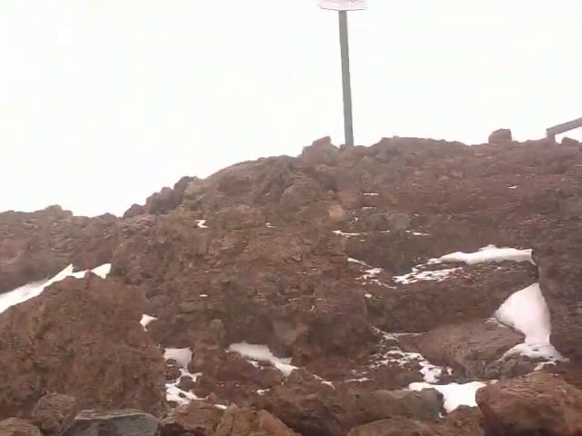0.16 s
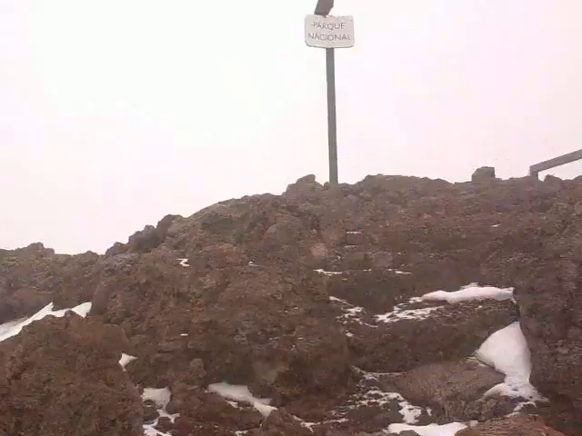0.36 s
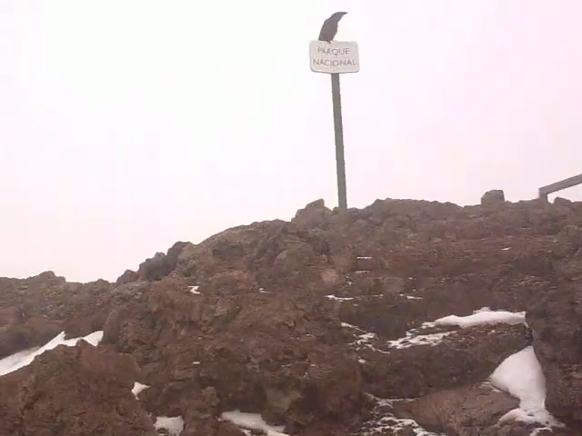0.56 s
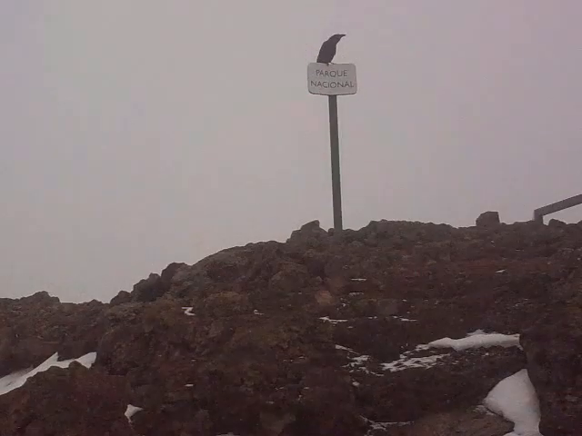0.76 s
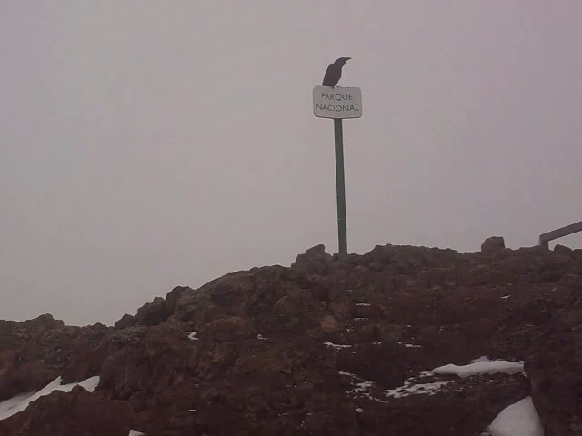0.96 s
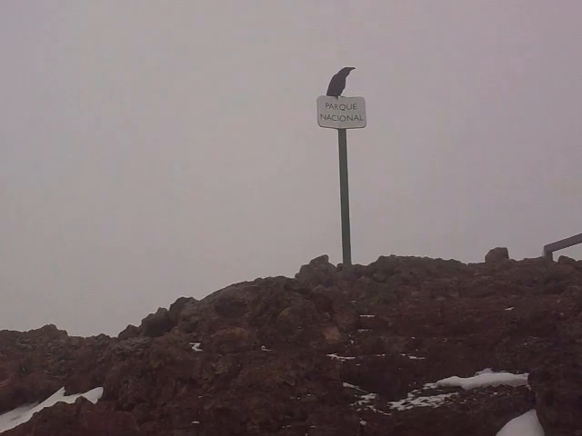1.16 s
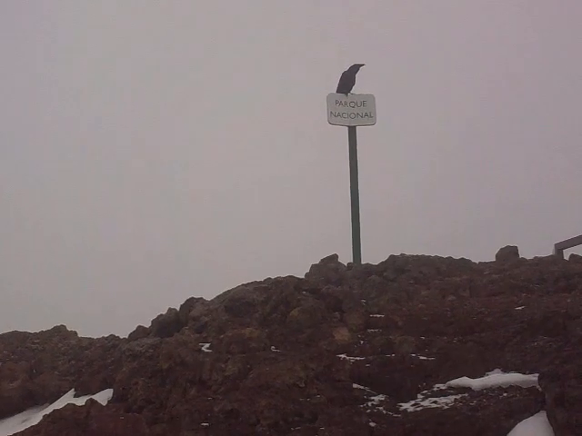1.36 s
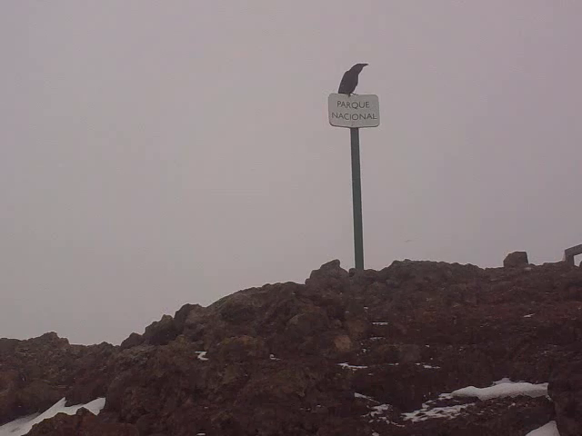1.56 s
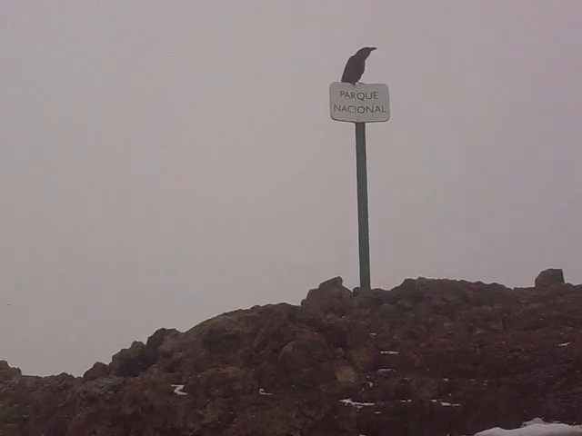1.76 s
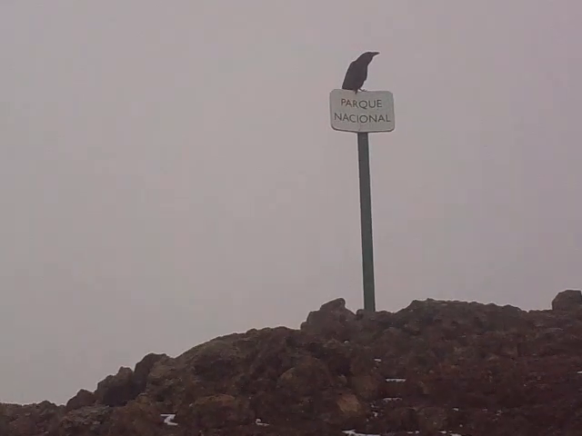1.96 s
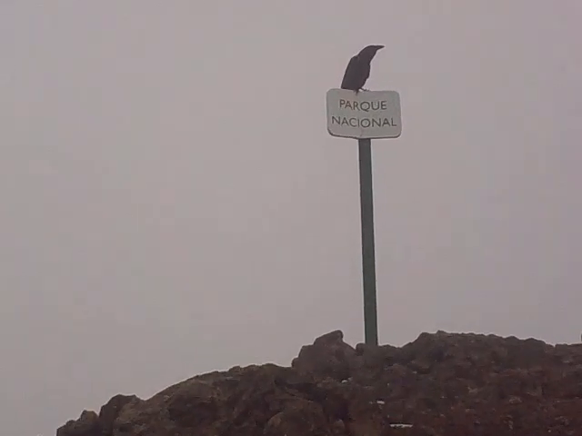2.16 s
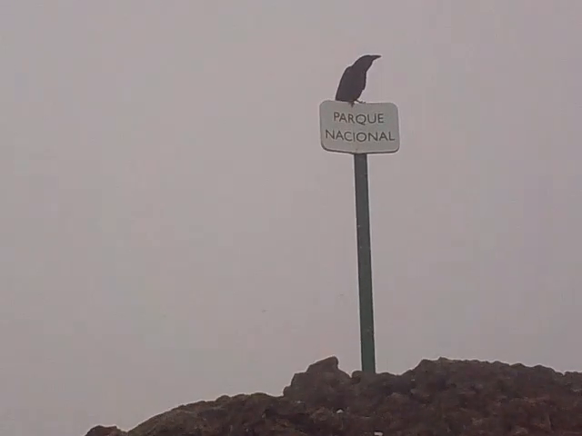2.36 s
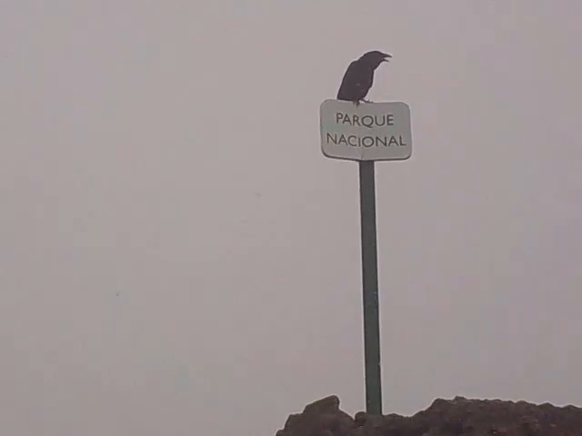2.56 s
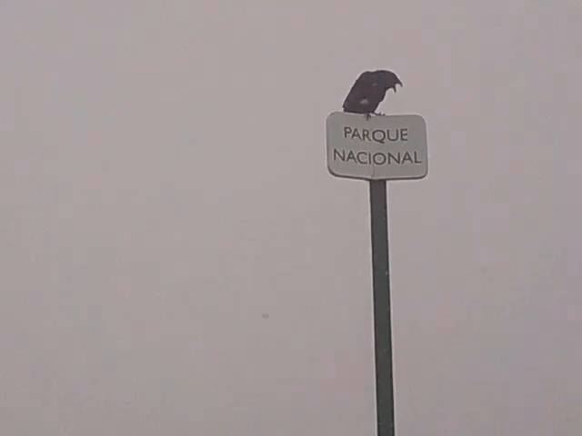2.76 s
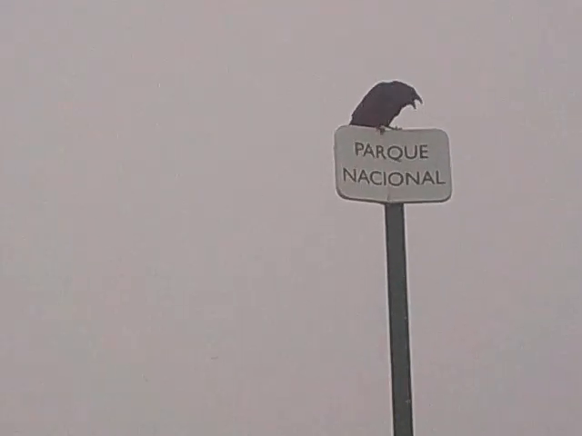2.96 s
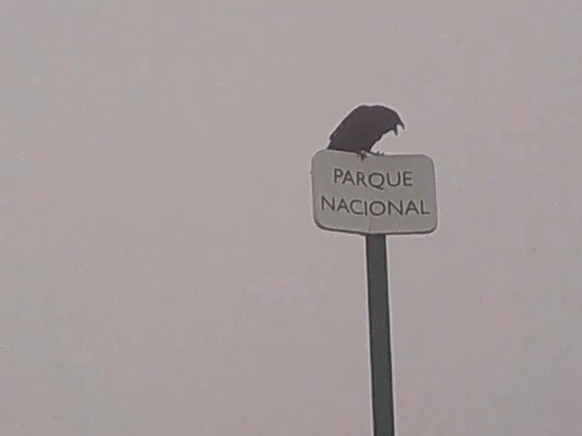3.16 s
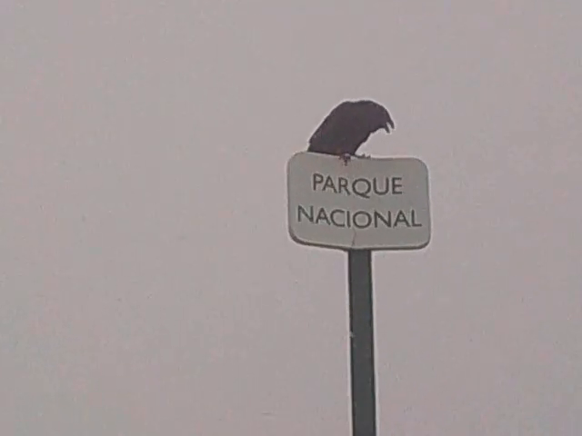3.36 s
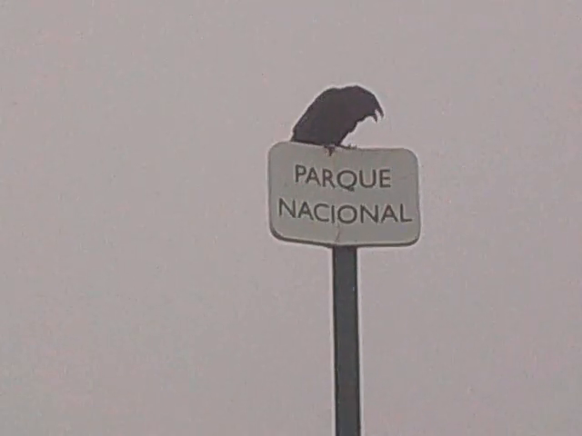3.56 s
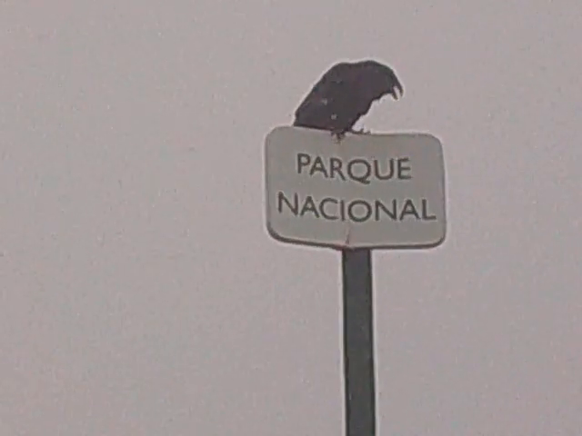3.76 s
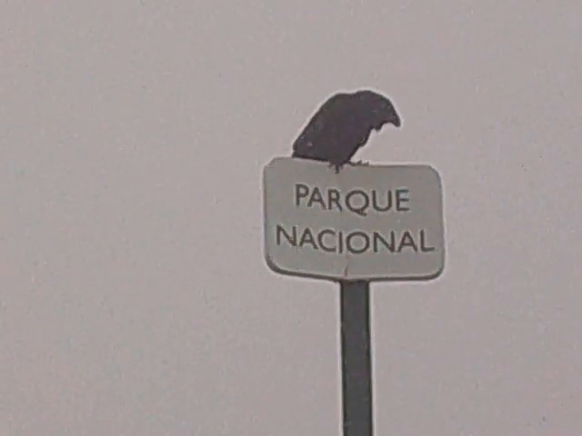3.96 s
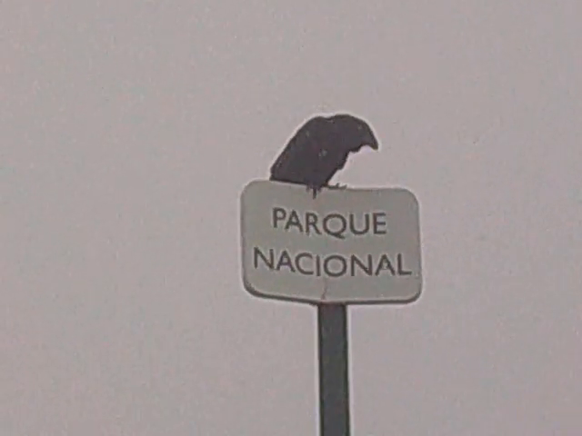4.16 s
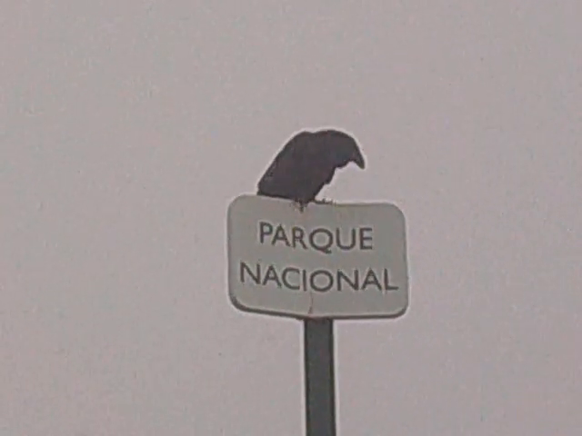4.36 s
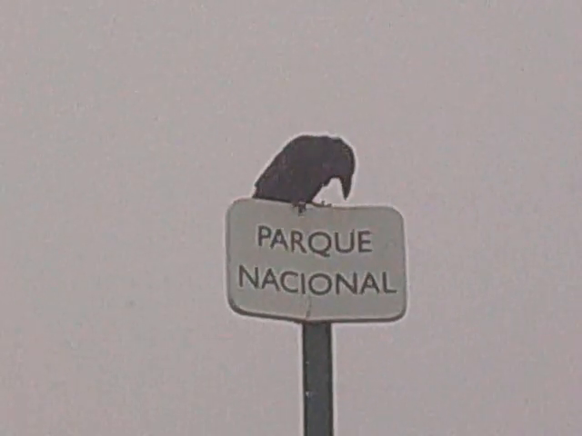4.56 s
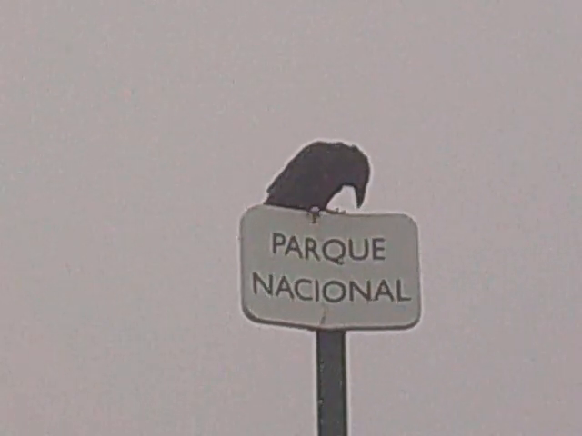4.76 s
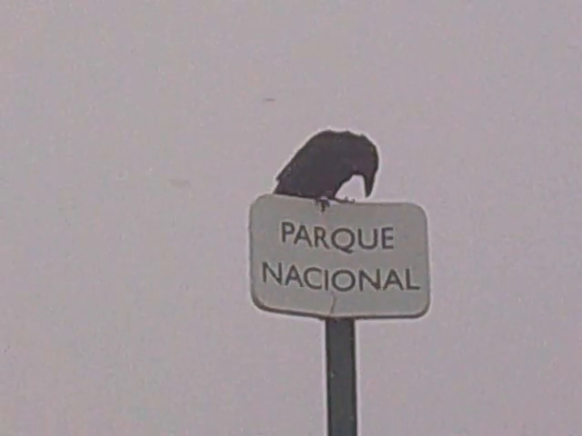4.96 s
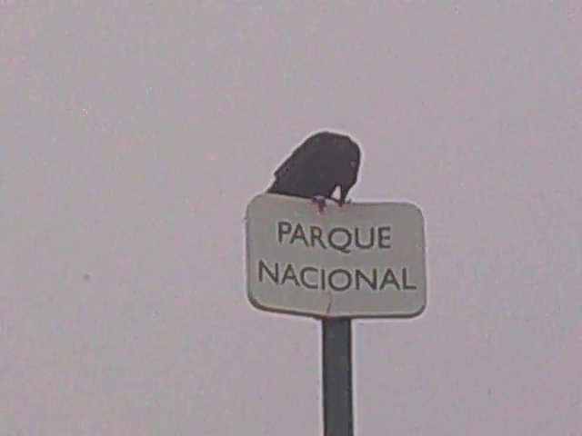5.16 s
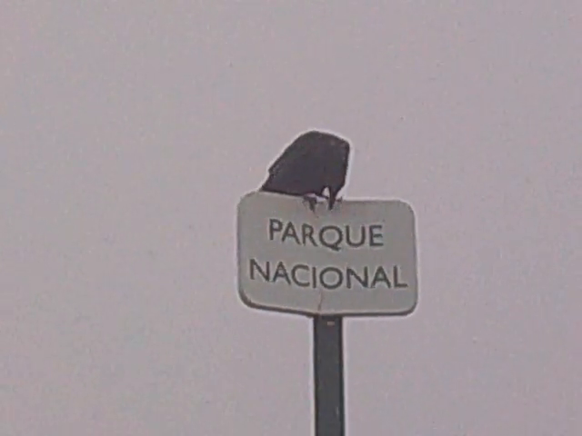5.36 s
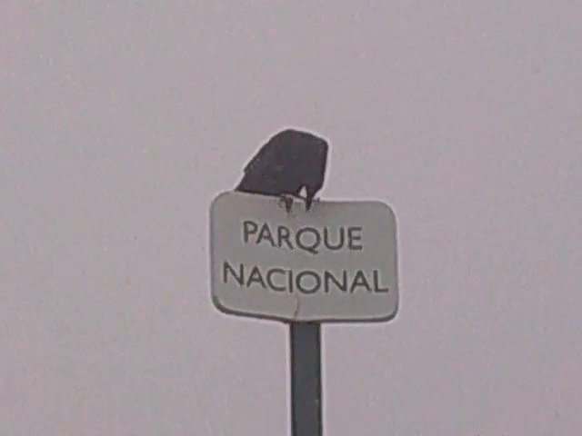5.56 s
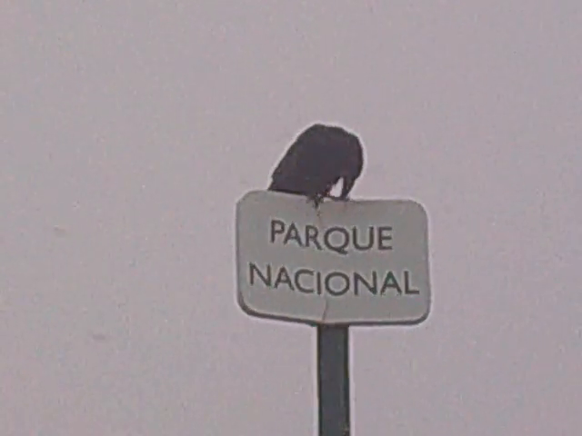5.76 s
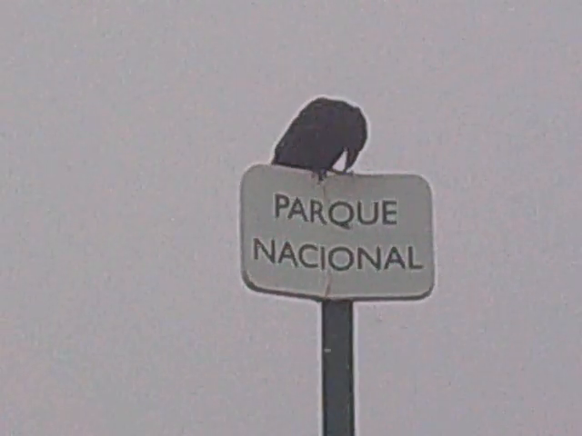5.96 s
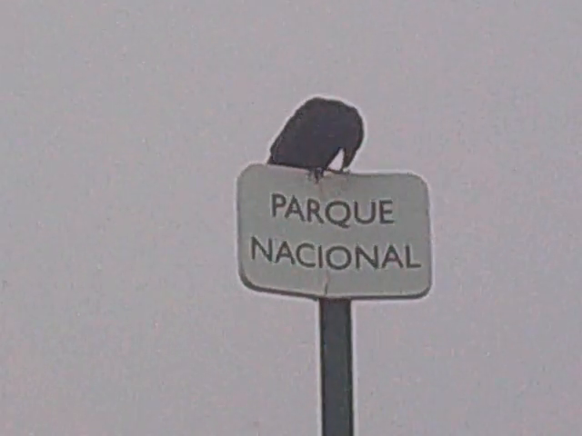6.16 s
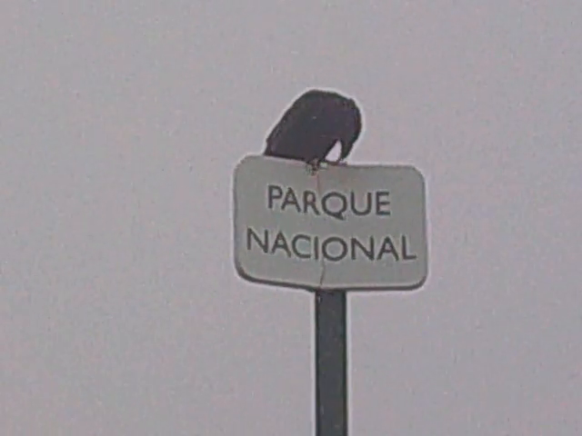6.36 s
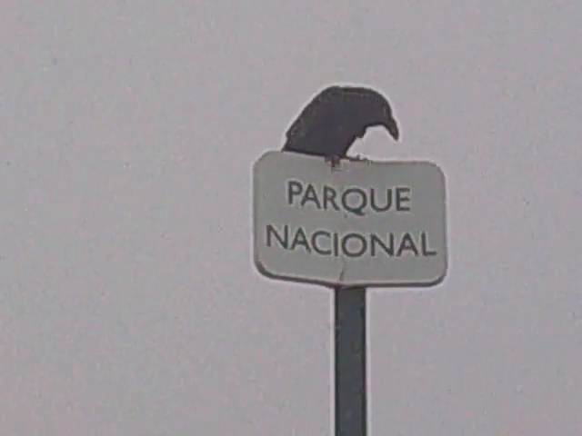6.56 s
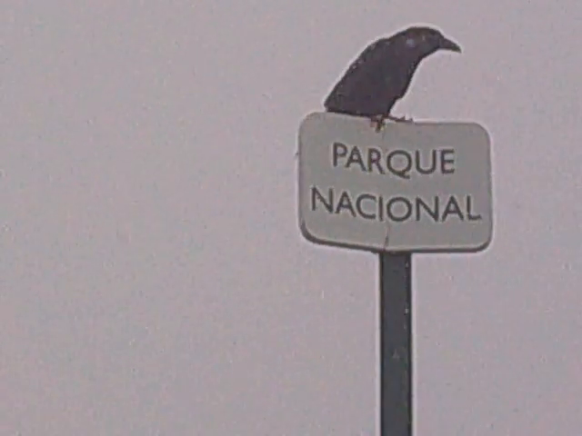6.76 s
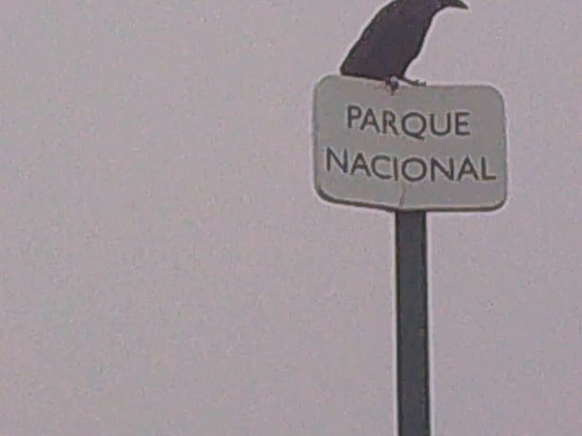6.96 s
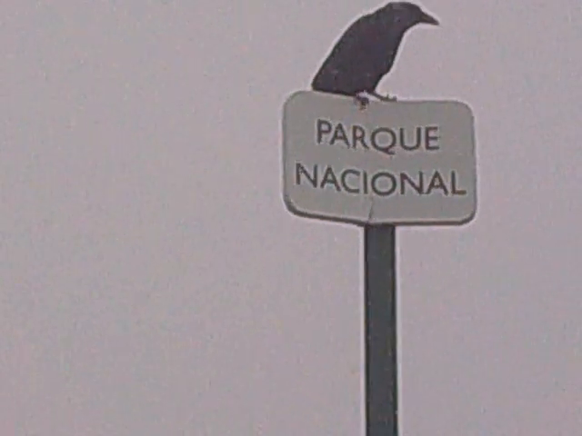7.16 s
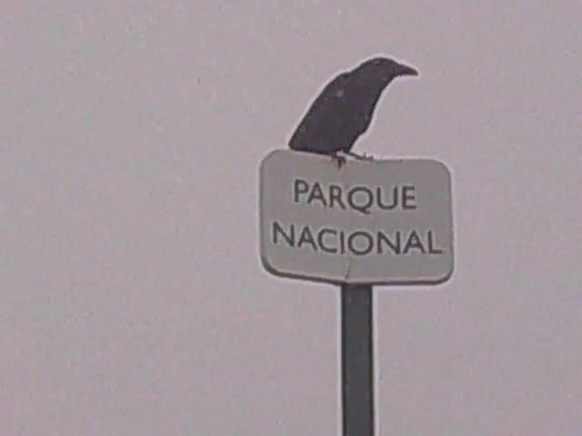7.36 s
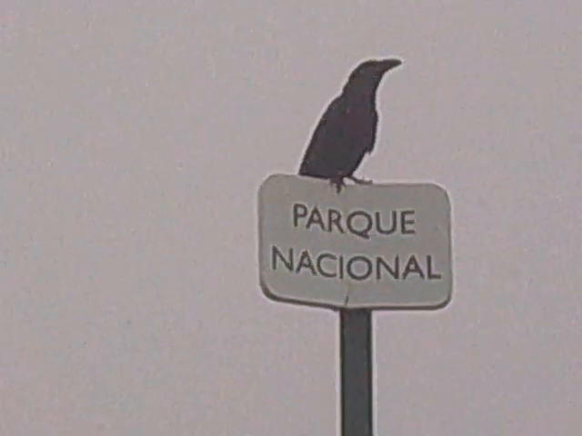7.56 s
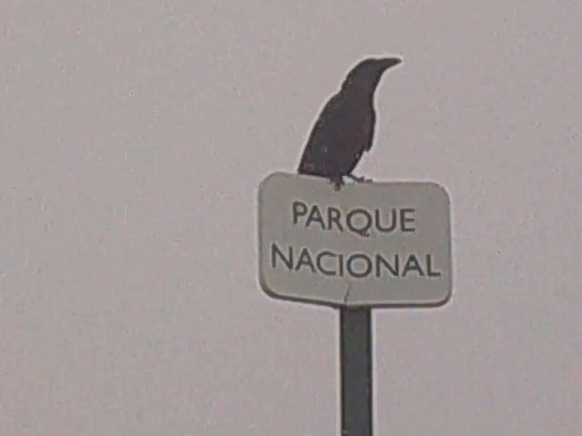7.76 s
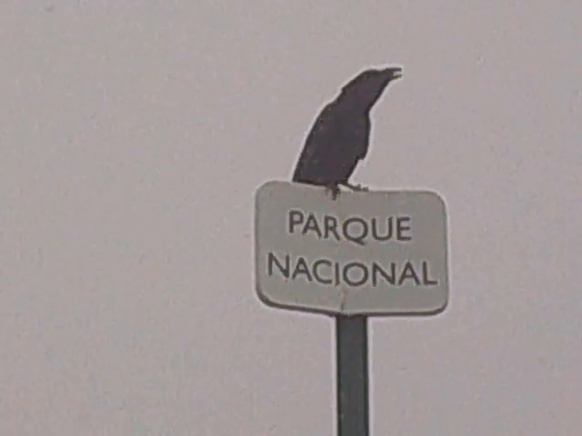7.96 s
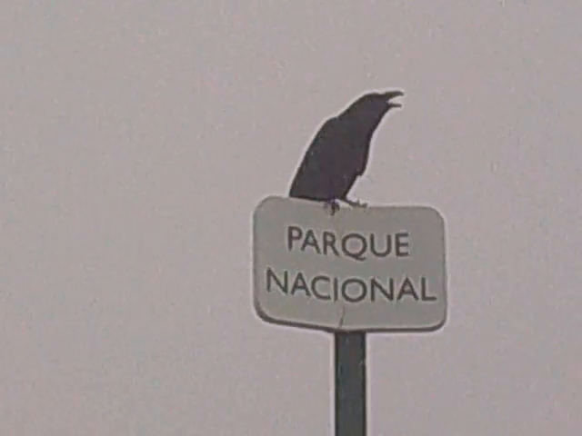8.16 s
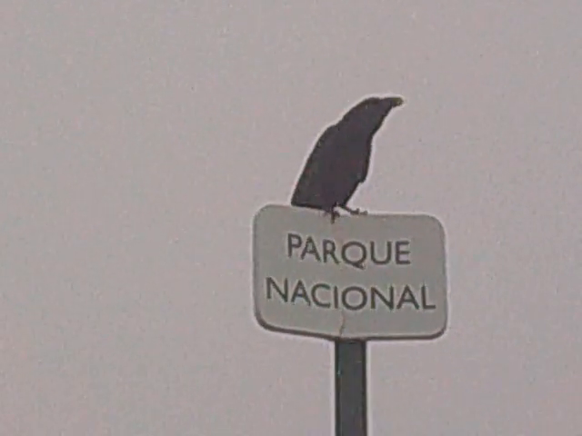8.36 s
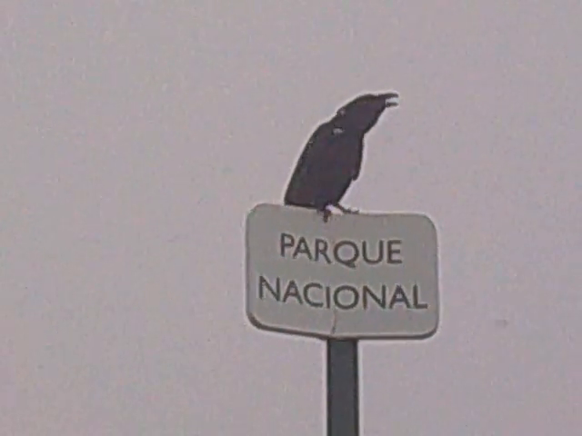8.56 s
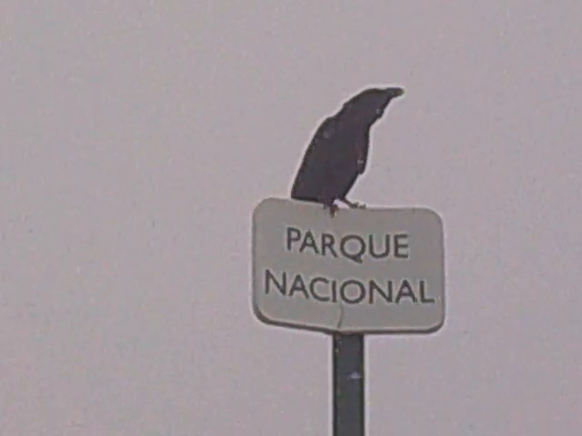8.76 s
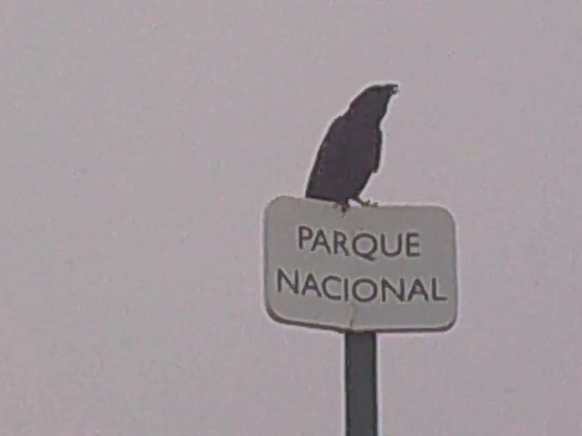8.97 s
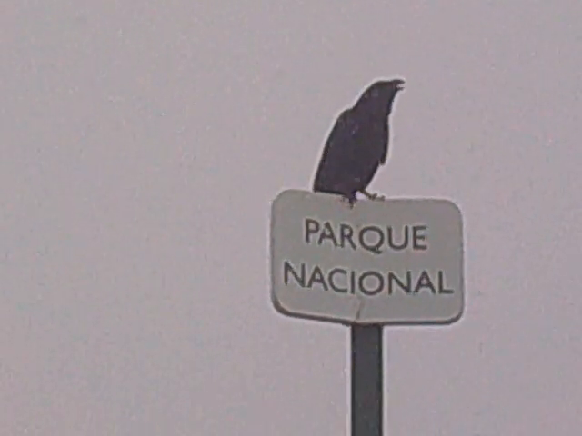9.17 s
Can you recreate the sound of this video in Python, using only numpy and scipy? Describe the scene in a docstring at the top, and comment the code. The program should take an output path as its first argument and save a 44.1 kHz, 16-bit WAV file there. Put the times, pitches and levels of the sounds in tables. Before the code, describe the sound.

A raven gives short hoarse croaks in small runs on a quiet windy mountaintop, with sleet ticking and sharp pops striking the microphone.

```python
"""Thin, nearly still air murmurs on a mountain top: shaped noise that swells and drifts.
From the start a raven croaks in short runs: pulses rattle, ring its windpipe and beak, and echo off rocks.
Soon sleet ticks nearby (short noise bursts) and soft buffets brush the microphone (swells of low noise).
From 1.5 s some grains strike the microphone: a shove, a crack and a ringing casing.
Near 7 s one gust rises fast and falls more slowly: shaped noise with crackles."""
import sys
import numpy as np
from scipy import signal
from scipy.fft import next_fast_len
from scipy.io import wavfile
from scipy.ndimage import uniform_filter1d

SR = 44100
rng = np.random.default_rng(int(sys.argv[2]) if len(sys.argv) > 2 else 0)


def generate_wav(sig):
    """Save sig (samples, or channels by samples) to the path in sys.argv[1] as 16-bit PCM at SR."""
    pcm = np.round(np.clip(np.atleast_2d(sig).T, -1, 1) * 32767).astype(np.int16)
    wavfile.write(sys.argv[1], SR, pcm)


N = 407484
TIME = np.arange(N) / SR


def gain_of(db):
    """Turns decibels into a plain multiplier."""
    return 10 ** (np.asarray(db) / 20)


def evened(x):
    """Scales a sound to an average strength (rms) of one."""
    return x / np.sqrt(np.mean(x ** 2) + 1e-20)


def smooth(x, seconds):
    """Runs a moving average twice, each of the given length."""
    size = max(int(seconds * SR), 1)
    once = uniform_filter1d(x, size)
    return uniform_filter1d(once, size)


def steadied(x):
    """Holds the strength near one from moment to moment, but keeps the single pulses."""
    power = abs(smooth(x ** 2, 0.022))
    return x / np.sqrt(power + 1e-14)


def wander(size, seconds):
    """A smoothed random curve around zero; more seconds make it slower."""
    curve = evened(smooth(rng.standard_normal(size + 4000), seconds))
    return curve[2000:2000 + size]


def ramp(u):
    """Eases from 0 to 1 as u does, then holds."""
    return np.sin(np.pi / 2 * np.clip(u, 0, 1))


def add(mix, s, sound):
    """Mixes a sound in at time s; what comes before time zero is dropped."""
    at = round(s * SR)
    sound = sound[max(-at, 0):]
    part = mix[max(at, 0):][:len(sound)]
    part += sound[:len(part)]


def coloured(x, points):
    """Boosts and cuts pitches to follow (f/Hz, level/dB) points, with no sound ahead of its cause."""
    size = next_fast_len(len(x) + 4096)
    hz, db = np.transpose(points)
    bin_hz = abs(np.fft.fftfreq(size, 1 / SR))
    bin_db = np.interp(np.log(bin_hz + 1), np.log(hz), db)
    # the Hilbert transform finds the timing (phase) that goes with these levels
    response = np.exp(np.conj(signal.hilbert(np.log(gain_of(bin_db)))))
    return np.fft.ifft(np.fft.fft(x, size) * response).real[:len(x)]


def band(x, hz, kind, order=2):
    """Keeps the highs, the lows or a band, with a Butterworth filter."""
    return signal.sosfilt(signal.butter(order, hz, kind, fs=SR, output="sos"), x)


def resonate(x, modes, factor):
    """Rings side-by-side resonances whose pitches all move with one factor."""
    out = 0
    for hz, width, db in modes:
        # shift the resonance down to zero pitch, smooth there, and shift it back
        turn = np.exp(2j * np.pi * np.cumsum(hz * factor * np.ones(len(x))) / SR)
        r = np.exp(-np.pi * width / SR)
        ringing = turn * signal.lfilter([1 - r], [1, -r], x / turn)
        out = out + gain_of(db) * ringing.real
    return out


# colour of the still air's noise: f/Hz, level/dB (relative)
AIR_COLOUR = [(15, -19.5), (25, -5.5), (184, -7.5), (284, -11.5), (513, -7), (557, -13.5), (955, -16.5),
              (1250, -19), (2730, -21), (4330, -21.5), (5670, -28), (8270, -26.5), (15800, -31.5)]
# swell of the murmur, before its small boost and random drift: t/s, level/dB
MURMUR_SWELL = [(0.0, -57), (1.0, -62), (6.87, -62), (7.05, -59), (7.59, -63.5), (9.14, -60.5),
                (9.24, -61.5)]


def air(low_db=1.5, hiss_db=-59.0, hiss_follows=0.42):
    """A low murmur of moving air under a thin hiss, which swells with it but less."""
    swell_db = np.interp(TIME, *np.transpose(MURMUR_SWELL))
    drift_db = 1.5 * wander(N, 0.055)
    noise = coloured(rng.standard_normal(N), AIR_COLOUR)
    murmur = evened(band(noise, 427, "low")) * gain_of(swell_db + low_db + drift_db)
    hiss_level_db = hiss_db + hiss_follows * (swell_db - swell_db.mean())
    hiss = evened(band(noise, 377, "high", order=3)) * gain_of(hiss_level_db)
    return murmur + hiss


FIRST_FLUTTER_HZ, SLOWING_S = 104.2, 0.065  # the rattle moves from this rate to the croak's own rate


def syrinx(t, turns, rattle, flutter_hz, shimmer_db=-1.0, chop_db=25, breath=0.032):
    """The voice box: sharp pulses, where a slower flutter lets one through and smothers the next few."""
    at = np.flatnonzero(np.diff(np.floor(turns), prepend=-1))  # one pulse a turn
    rate = flutter_hz + (FIRST_FLUTTER_HZ - flutter_hz) * np.exp(-(t / SLOWING_S) ** 2)
    flutter = np.cumsum(rate * (1 + 0.09 * wander(len(t), 0.0078))) / SR
    # each flutter cycle begins on a pulse, and the following pulses weaken
    starts = np.diff(np.floor(flutter[at]), prepend=-1) > 0
    count = np.arange(len(at))
    age = count - np.maximum.accumulate(count * starts)
    smothered = 1 - np.exp(-(age * (0.42 + rattle[at] ** 4)) ** 2)
    # each pulse comes a hair early or late, which blurs the high harmonics
    slip = np.round(0.000022 * SR * rng.standard_normal(len(at))).astype(int)
    shimmer = shimmer_db * rattle[at] * rng.standard_normal(len(at))
    pulse_db = shimmer - chop_db * rattle[at] * smothered
    pulses = np.zeros(len(t))
    pulses[np.clip(at + slip, 0, len(t) - 1)] = gain_of(pulse_db)
    # a puff of turbulence follows each pulse
    puff_shape = signal.lfilter([1], [1, -np.exp(-1 / (0.0046 * SR))], pulses)
    return pulses + breath * puff_shape * rng.standard_normal(len(t))


SLACK_HZ, SAG_S, SAG_POWER = 242.3, 0.075, 2.3  # pitch climbs from slack, and sags back as breath runs out
SWELL_POWER, FADE_POWER = 0.99, 1.58  # the bend of the attack and of the release
FIRST_RATTLE, SETTLE_S = 0.88, 0.053  # a croak starts as a deep rattle (0-1), then firms
OPENING_S, CLOSING_S, CLOSED_DB = 0.034, 0.06, -16  # the beak opens after the start and closes at the end
HUM_DB = -22  # shared by the hum and chest sound of all croaks, before effort and rattle shape them

# resonances of the windpipe, before the throat moves them: f/Hz, width/Hz, level/dB (relative)
WINDPIPE_MODES = [(1100, 37, 11), (1427, 100, 33), (1834, 50, 17.5)]
# smooth swing of the membranes: harmonic number, level/dB (against HUM_DB)
HUM_HARMONICS = [(1, -33.5), (2, -27), (3, -18.5)]
# colour of the beak's sound with the head level, bowed and stretched up: f/Hz, level/dB (relative)
HEAD_LEVEL = [(1350, -58), (2300, -14), (2670, 1.5), (2870, 3), (3460, -6.5), (4050, 1), (4450, -15.5),
              (4810, -13), (5240, -23), (6330, -25), (7010, -31.5), (9590, -35.5), (10700, -41),
              (15000, -58)]
HEAD_BOWED = [(1350, -83.5), (2300, -6), (2410, -11.5), (2610, -5), (2780, -5.5), (3030, 1), (3120, 1),
              (3540, 1.5), (4700, -7), (5450, -19.5), (6690, -23), (9220, -23.5), (11800, -35.5),
              (15000, -62)]
HEAD_RAISED = [(1350, -64), (2300, -8.5), (2840, -7), (3070, 3), (3510, -3.5), (3800, -1.5), (4730, -10.5),
               (5040, -18), (5710, -14), (6580, -26), (7640, -21), (9590, -33.5), (10400, -45),
               (15000, -55)]
# when the head bows, then when it stretches up: t/s
HEAD_TIMES = [2.5, 7.5]


def croak(row, jitter=0.005, narrowing=0.12, widening_s=0.06, chest_db=-23):
    """Pulses ring the windpipe, whose resonances rise as the throat opens, and also the beak."""
    (start, length, level_db, top_hz, climb_s, attack_s, release_s,
     bright_db, held_rattle, pipe_factor, flutter_hz) = row
    t = np.arange(0, length, 1 / SR)
    left = length - t
    effort = ramp(t / attack_s) ** SWELL_POWER * ramp(left / release_s) ** FADE_POWER

    climb = 1 - np.maximum(1 - t / climb_s, 0) ** 2
    sag = 1 - np.maximum(1 - left / SAG_S, 0) ** SAG_POWER
    hz = SLACK_HZ + (top_hz - SLACK_HZ) * climb * sag
    rattle = held_rattle + (FIRST_RATTLE - held_rattle) * np.exp(-(t / SETTLE_S) ** 2)
    rattle = np.clip(rattle, 0, 1)
    turns = np.cumsum(hz * (1 + jitter * wander(len(t), 0.003))) / SR
    drive = syrinx(t, turns, rattle, flutter_hz)

    throat = pipe_factor * (1 - narrowing * np.exp(-t / widening_s)) * (hz / 350) ** 0.15
    pipe = resonate(drive, WINDPIPE_MODES, throat)
    pipe = band(pipe, 1040 * pipe_factor, "high", order=5)
    pipe = band(pipe, 2280 * pipe_factor, "low", order=8)

    head = [HEAD_LEVEL, HEAD_BOWED, HEAD_RAISED][np.searchsorted(HEAD_TIMES, start)]
    beak = band(coloured(drive, head), 2930, "high", order=4)
    beak = band(beak, 14800, "low", order=6)
    opening = ramp(t / OPENING_S) ** 2 * gain_of(CLOSED_DB * (1 - ramp(left / CLOSING_S)))

    # the low harmonics stand out where the rattle eases
    harmonics = sum(gain_of(db) * np.cos(2 * np.pi * k * turns) for k, db in HUM_HARMONICS)
    hum = np.sqrt(1 - rattle ** 2) * harmonics
    chest = gain_of(chest_db) * rattle * steadied(band(drive, [220, 850], "band", order=3))
    voice = steadied(pipe) + gain_of(bright_db) * opening * steadied(beak)
    return start, effort * (gain_of(level_db) * voice + gain_of(HUM_DB) * (hum + chest))


def rocks(x, t60=0.29, scatter_db=-23, near_db=-19, near_t60=0.083):
    """Quick reflections from sign and ground, then faint scatter from the slope; rough rock dulls both."""
    t = TIME[:SR // 2]
    hits = rng.random((2, len(t))) < 2500 / SR  # about 2500 reflections a second
    near, far = rng.standard_normal((2, len(t))) * hits
    # t60: seconds to fade by 60 dB
    near = band(near, 3200, "low", order=1) * gain_of(-60 * t / near_t60) * (t > 0.001)
    far = band(far, 6000, "low", order=1) * gain_of(-60 * t / t60) * (t > 0.008)
    echo = gain_of(near_db) * near / np.linalg.norm(near)
    echo = echo + gain_of(scatter_db) * far / np.linalg.norm(far)
    return x + signal.fftconvolve(x, echo)[:N]


# one row a croak: t/s, length/s, level/dB (windpipe part, before effort and echoes),
# pitch the climb aims for f/Hz, climb/s, attack/s, release/s, beak level/dB (against the windpipe),
# held rattle 0-1, factor on the windpipe's pitches, settled flutter f/Hz (before its wander)
RAVEN_CROAKS = [(-.16, 0.23, -28, 368.2, .12, .06, 0.03, -4, 0.16, 0.93, 73.1),
                (0.293, 0.2, -29, 322.3, .145, 0.069, 0.042, -4, 0.34, 0.93, 90.4),
                (2.802, 0.27, -26, 359.6, 0.15, 0.11, 0.042, -3.5, 0.27, 0.998, 79),
                (3.258, 0.22, -25, 365.3, .108, 0.067, 0.039, -4.5, 0.36, 0.99, 69.2),
                (3.779, 0.2, -26, 338, .1, 0.098, 0.045, -5, 0.4, 0.951, 76.1),
                (8.226, 0.22, -31.5, 362.5, .13, 0.094, 0.054, -1.5, 0.36, 0.93, 83.7),
                (8.721, 0.18, -33, 350.8, 0.12, 0.14, 0.052, 0, 0.46, 0.89, 79),
                (9.205, 0.15, -36, 352, 0.1, 0.065, 0.036, -0.5, .75, 0.8, 95)]


def raven():
    """All the croaks, with their sound thrown back by the rocks."""
    out = np.zeros(N)
    for row in RAVEN_CROAKS:
        add(out, *croak(row))
    return rocks(out)


# finer grains at random times: how many a second, middle and spread of their peaks, gain on their low part
FAINT_PER_S, FAINT_DB, FAINT_SPREAD_DB, FAINT_LOW_DB = 2.5, -45, 1.5, -7

# sleet that lands nearby: t/s, peak level/dB, gain on the part below 3.1 kHz level/dB
NEARBY_SLEET = [(0.1168, -35.5, -2), (0.85, -38, -9), (1.0258, -41.5, 7.5), (2.298, -29.5, -1),
                (2.587, -32, -18), (2.6592, -38.5, 7), (4.064, -37.5, -10), (4.133, -38, -10),
                (4.234, -34.5, -3), (4.4695, -37.5, -11), (5.3852, -37.5, 0), (5.765, -39.5, 8),
                (5.8525, -37.5, -17), (6.3783, -39, 6), (6.9318, -38.5, 7), (7.235, -41, -14),
                (7.3554, -34.5, -18), (7.449, -40, -2), (7.9595, -38, -14), (8.7188, -38, 5),
                (8.9443, -36, 3)]
# colour of a landing grain, before its low and high parts are balanced: f/Hz, level/dB (relative)
SLEET_COLOUR = [(800, -2.5), (2500, -2.5), (3800, 6), (4700, 9.5), (6500, 6.5), (9000, 7), (11500, -6.5),
                (16000, -45)]


def ticks(crack_s=0.0037, tail_s=0.014, tail=0.28):
    """Each grain cracks on landing and leaves a short fizz; faint ones fall at random among them."""
    out, t = np.zeros(N), TIME[:SR // 16]
    times = TIME[rng.random(N) < FAINT_PER_S / SR]
    faint = [(s, FAINT_DB + FAINT_SPREAD_DB * rng.standard_normal(), FAINT_LOW_DB) for s in times]
    for s, db, low_db in list(NEARBY_SLEET) + faint:
        fading = np.exp(-t / crack_s) + tail * np.exp(-t / tail_s)
        tick = coloured(rng.standard_normal(len(t)) * fading, SLEET_COLOUR)
        low = band(tick, 3100, "low", order=3)
        tick = band(tick, 4200, "high") + gain_of(low_db) * low
        add(out, s, gain_of(db) * tick / abs(tick).max())
    return out


GUST_START_S, GUST_PEAK_S, GUST_END_S = 6.89, 7.02, 7.21
GUST_DB, GUST_RISE_S, GUST_FALL_S = -42, 0.06, 0.13  # level of the rush at the peak, before random lumps

# soft buffets of air: t/s of the middle, length/s, level/dB at the middle
SOFT_BUFFETS = [(0.285, 0.077, -56), (.42, 0.43, -56.5), (4.87, 0.057, -51), (4.967, 0.077, -52),
                (6.37, 0.13, -52), (7.12, 0.51, -56.5)]
# colours of the buffets' and the gust's noise: f/Hz, level/dB (relative)
SOFT_COLOUR = [(20, 4), (45, 6.5), (130, -18), (300, -14), (800, -33), (3000, -25.5), (16000, -73)]
RUSH_COLOUR = [(18, -24), (30, 2.5), (148, -7.5), (373, -7.5), (403, -4.5), (709, -12.5), (894, -16),
               (1070, -15.5), (1700, -24), (14000, -37)]


def wind(lumps_db=2, crackle_db=-15, edge_s=0.063):
    """Noise in soft buffets on the microphone, and in one crackling gust that rises faster than it falls."""
    swell = sum(gain_of(db) * np.exp(-(2 * (TIME - s) / length) ** 2) for s, length, db in SOFT_BUFFETS)
    buffets = swell * evened(coloured(rng.standard_normal(N), SOFT_COLOUR))

    t = TIME - GUST_PEAK_S
    force = np.exp(np.minimum(t / GUST_RISE_S, -t / GUST_FALL_S))
    force = force * ramp((TIME - GUST_START_S) / edge_s) * ramp((GUST_END_S - TIME) / edge_s)
    grains = rng.standard_normal(N) * (rng.random(N) < 700 / SR)  # about 700 a second
    crackle = gain_of(crackle_db) * evened(band(grains, [1200, 4500], "band"))
    rush = evened(coloured(rng.standard_normal(N), RUSH_COLOUR))
    rush = band(rush + crackle, 11000, "low")
    gust = force * gain_of(GUST_DB + lumps_db * wander(N, 0.0027)) * rush
    return buffets + gust


# sleet that strikes the microphone: t/s, level/dB (peak of the shove, before the bass cuts), rise/s, fall/s,
# casing ring level/dB, factor on the casing's pitch, crack level/dB (both against the shove), bass cut f/Hz
STRIKES = [(1.5029, -17.5, 0.000051, 0.0015, 0, 0.98, -25, 90),
           (1.5917, -6, 0.000043, 0.0014, -21, 1.39, 1, 22),
           (3.8485, -13, 0.00056, 0.0021, -3, 0.89, -40, 110),
           (5.644, -18, 0.000059, 0.0011, 1, 0.974, -12, 100),
           (5.9328, -14, 0.00091, 0.0012, -2, 0.94, -45, 110),
           (5.9356, -22.5, 0.00044, 0.00026, -12, 1.2, 2.5, 80),
           (6.8838, -30.5, 0.0002, 0.00022, -24, 1.2, -20, 80),
           (7.0109, -25.5, 0.000032, 0.0015, -4, 0.86, -1, 60),
           (7.1578, -25.5, 0.00018, 0.00041, -24, 1.1, -16, 80),
           (9.1490, -9.5, 0.000078, 0.0013, -24, 0.64, -34, 65)]
# ringing of the camera's casing at pitch factor 1: f/Hz, level/dB (relative), time to fade by 60 dB t/s
CASING_MODES = [(193, 2.5, 0.011), (457, -12, 0.038), (1380, -5, 0.013), (2910, -3, 0.0037),
                (4320, -6.5, 0.0088)]


def pops(sub_hz=33, crack_s=0.00098):
    """A grain cracks and shoves the diaphragm, which swings back; the casing rings by where it is hit."""
    out, t = np.zeros(N), TIME[:SR // 12]
    for s, db, rise, fall, ring_db, pitch, crack_db, bass_hz in STRIKES:
        shove = (1 - np.exp(-(t / rise) ** 2)) * np.exp(-t / fall)
        casing = sum(gain_of(level - 60 * t * pitch / t60) * np.sin(2 * np.pi * hz * pitch * t)
                     for hz, level, t60 in CASING_MODES)
        # a soft blow leaves the high modes quiet
        ring = band(casing, min(1 / (2 * rise), SR / 3), "low", order=1)
        crack = rng.standard_normal(len(t)) * np.exp(-t / crack_s)
        crack = band(crack, [1250, 4300], "band", order=1)
        blow = shove / shove.max() + gain_of(ring_db) * ring + gain_of(crack_db) * crack
        add(out, s, gain_of(db) * band(blow, bass_hz, "high", order=1))
    return band(out, sub_hz, "high", order=1)


def scene():
    """Air, bird, sleet and wind at one microphone."""
    return (air() + raven() + ticks() + wind() + pops())[None]


def record(dry):
    """The recorder's band limit: a steep filter takes away what lies above about 15.9 kHz."""
    low_pass = signal.firwin(511, 15900, window=("kaiser", 9), fs=SR)
    return signal.oaconvolve(dry, low_pass[None], "same")


dry = scene()
out = record(dry)
generate_wav(out)
```